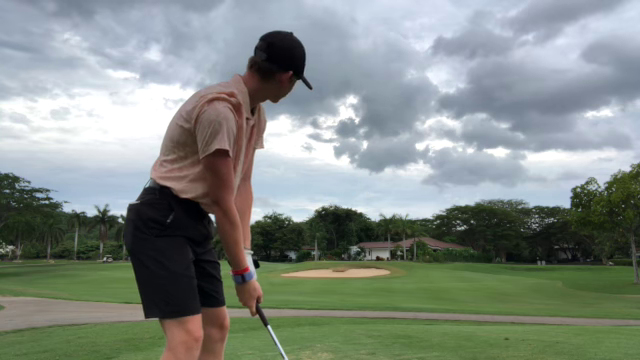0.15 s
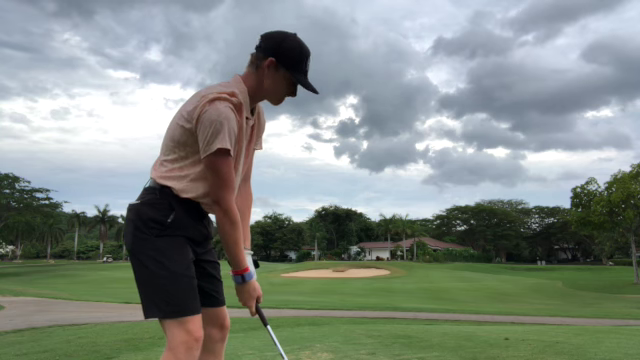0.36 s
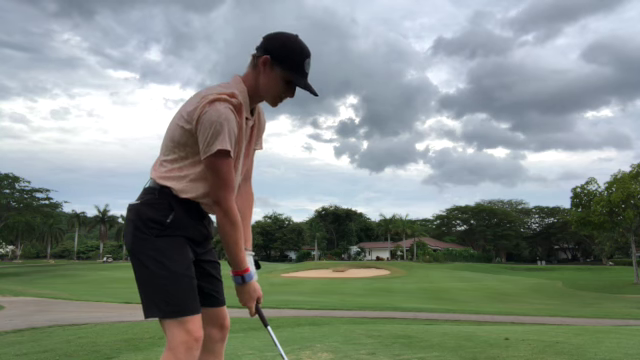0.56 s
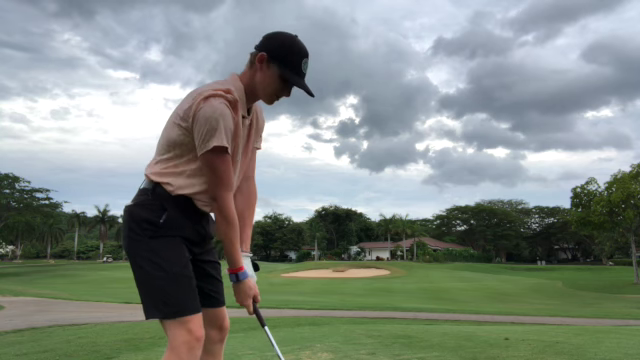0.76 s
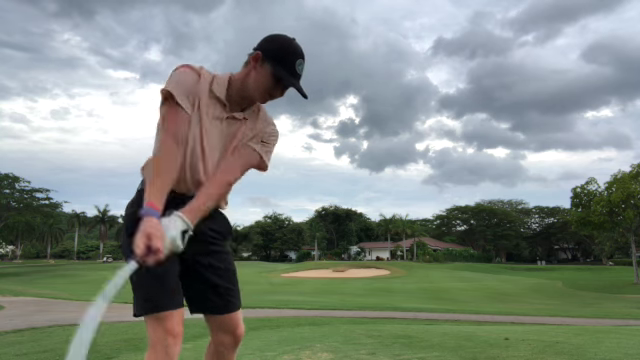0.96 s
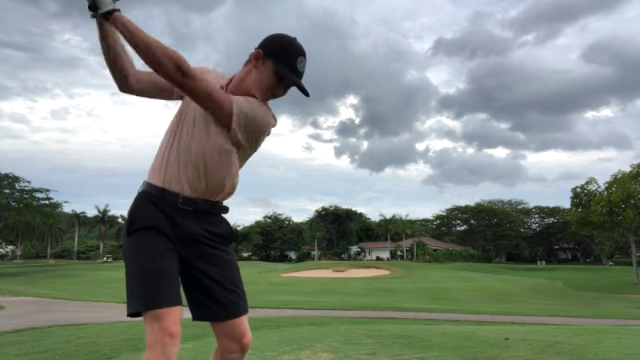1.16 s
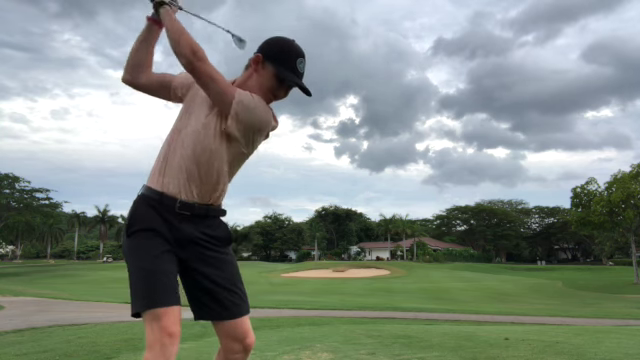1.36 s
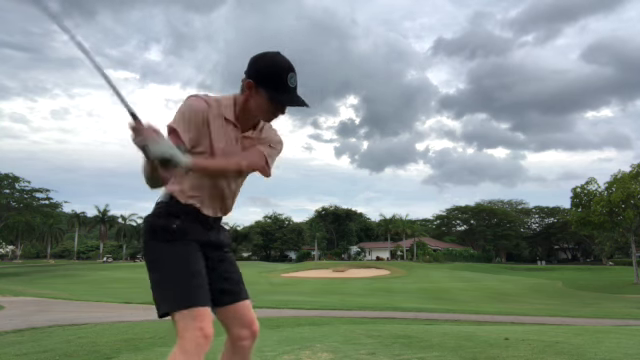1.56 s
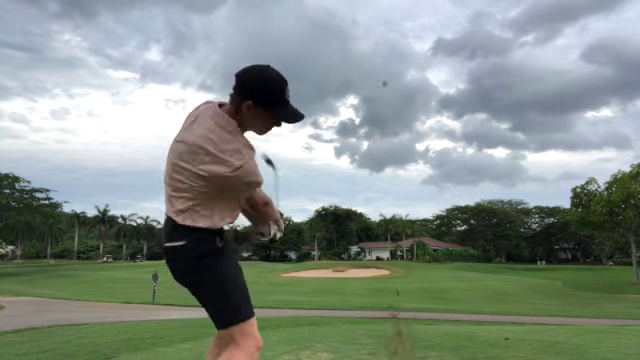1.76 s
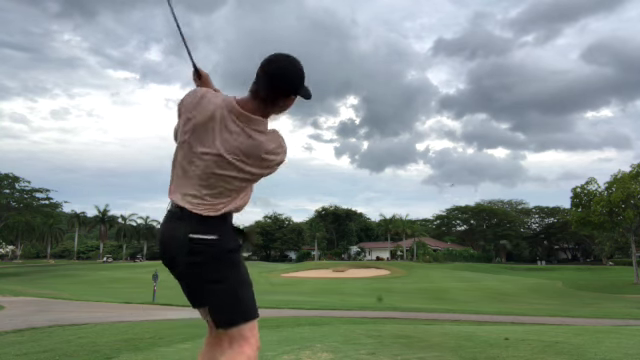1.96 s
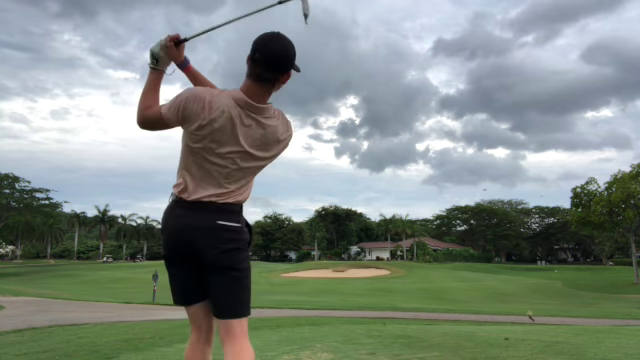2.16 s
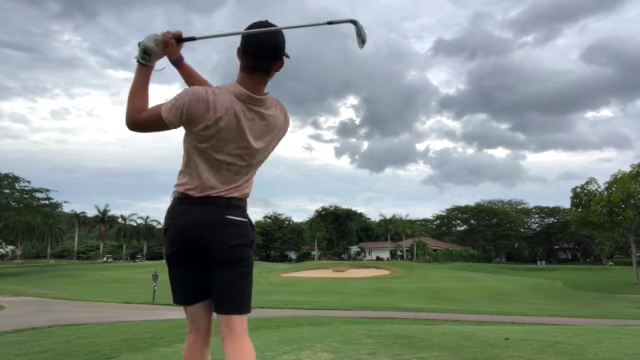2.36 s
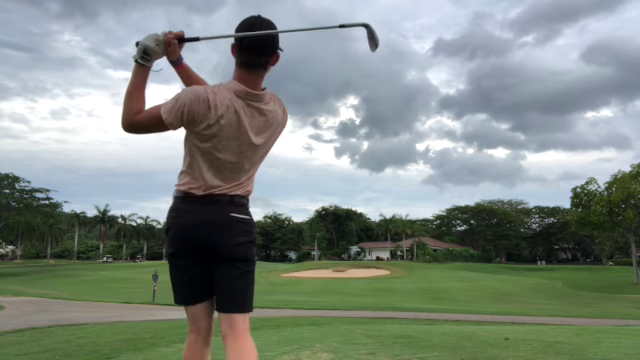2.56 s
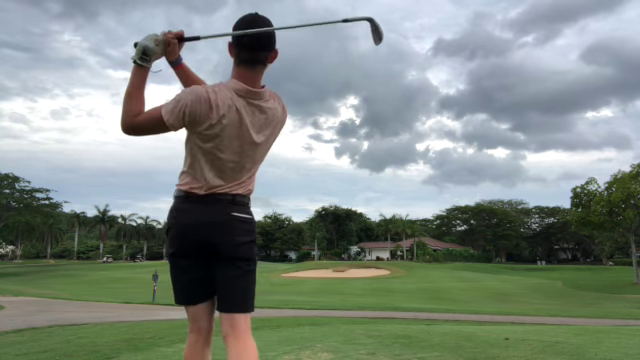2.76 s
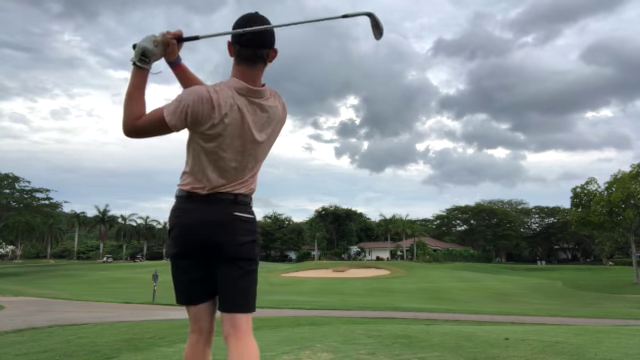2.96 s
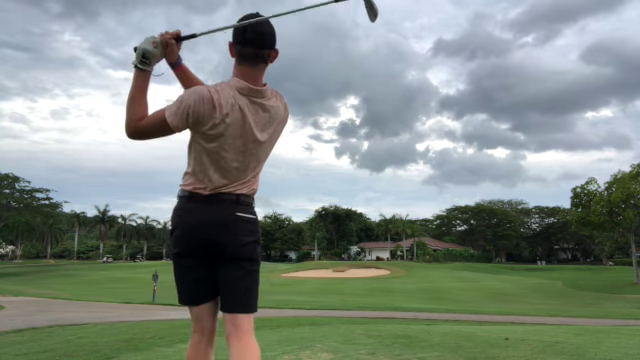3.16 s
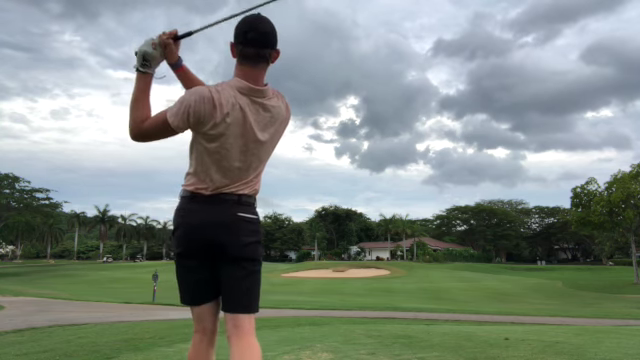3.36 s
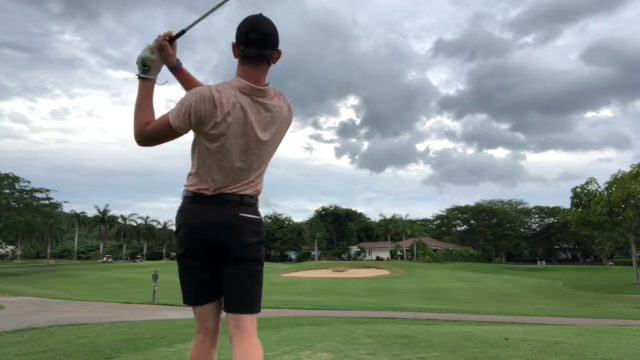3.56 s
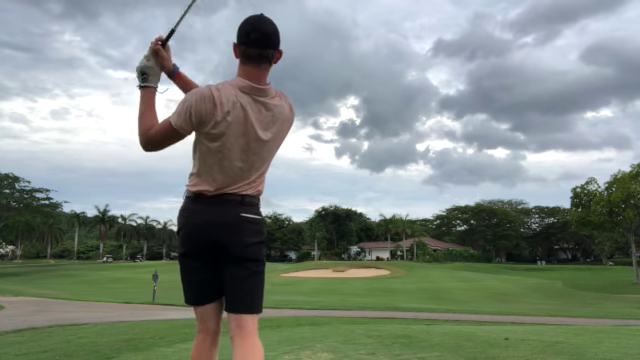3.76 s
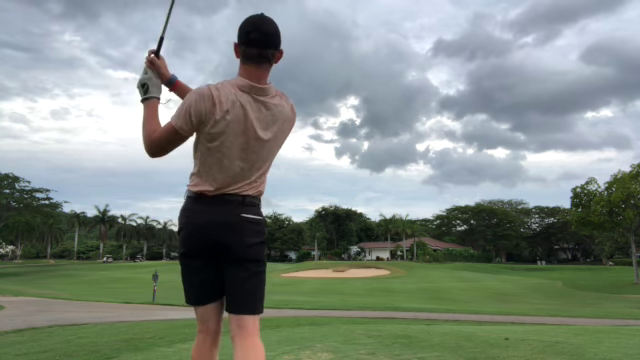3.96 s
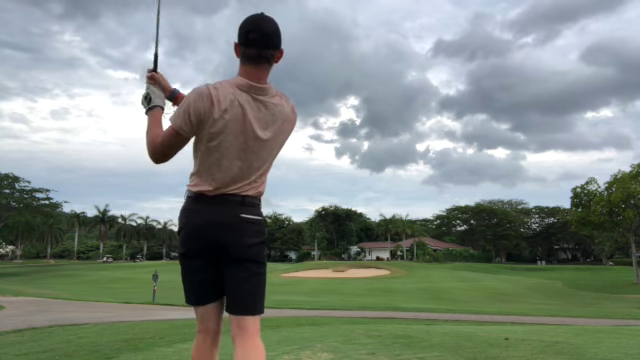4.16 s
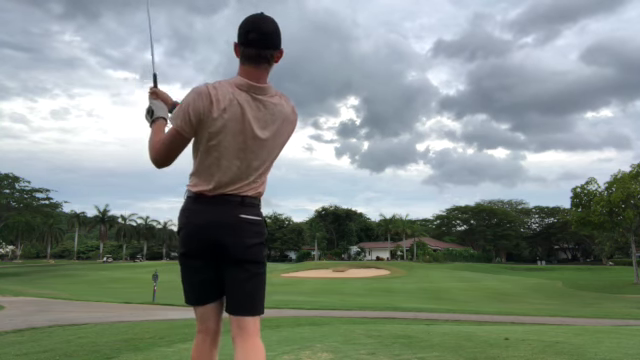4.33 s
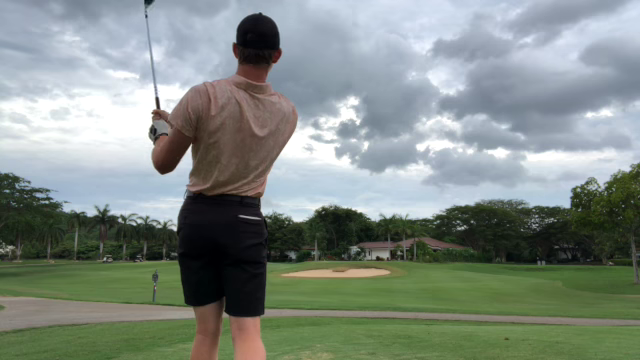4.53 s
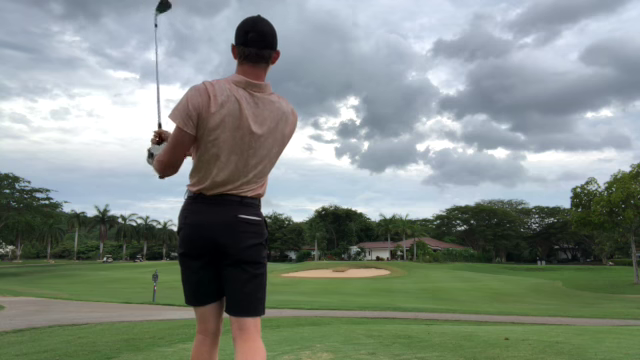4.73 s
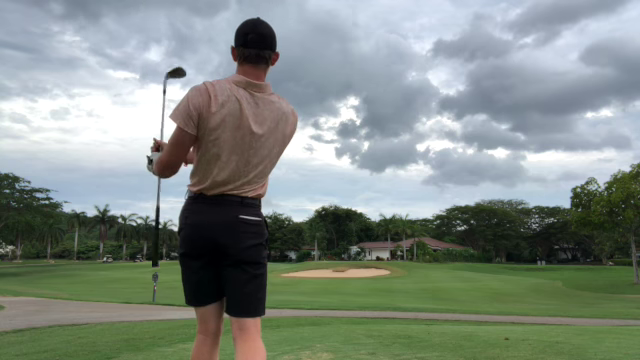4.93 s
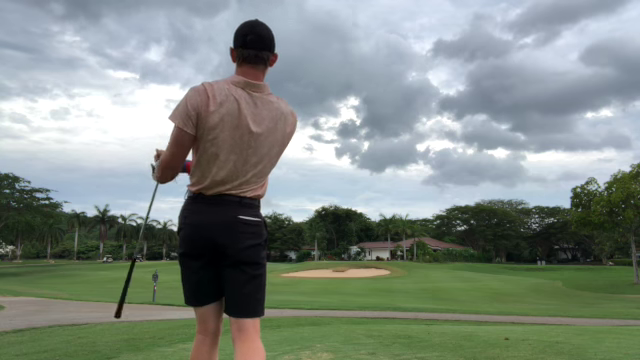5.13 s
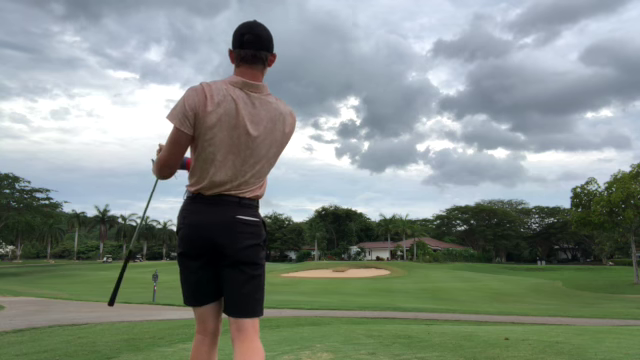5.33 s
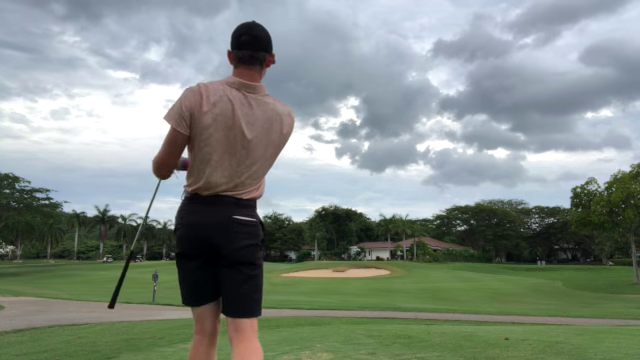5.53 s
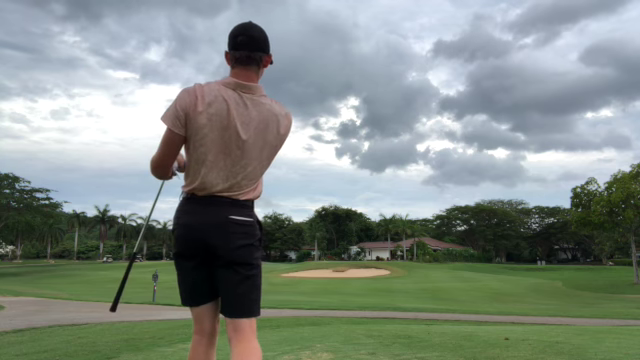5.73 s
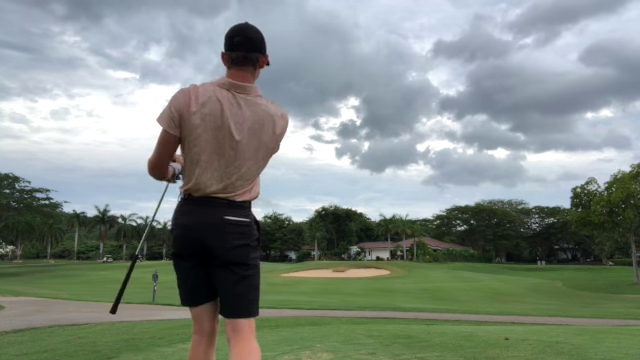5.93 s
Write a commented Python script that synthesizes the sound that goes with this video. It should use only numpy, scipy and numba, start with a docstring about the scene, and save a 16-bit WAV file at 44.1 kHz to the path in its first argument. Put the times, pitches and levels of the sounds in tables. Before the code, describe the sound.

A quiet outdoor background runs for about six seconds: softly hissing leaves, a thin, high insect hiss and the faint low rumble of a distant machine. Small birds chirp faintly from the start, and clothing rustles lightly between 0.7 and 1.3 seconds. At about 1.6 seconds a golf iron whooshes close by, rising quickly in pitch. At 1.7 seconds it hits the ball with one sharp, very short crack, by far the loudest sound, together with a dull thud and a brief rip of turf. Soil sprays and lands in tiny ticks until about 2.2 seconds. Slight rustles of cloth and grass come and go afterwards. Squeaky, slightly hoarse bird calls continue with a little echo from the trees, with a longer note around 3.3 seconds and somewhat clearer calls after 5.3 seconds. Very soft dove coos join from about 4.8 seconds to the end.

```python
"""An open golf course, where someone swings an iron. The shaft whistles through the air, the club face
cracks against the ball and the club tears up turf; crumbs of soil fall back, cloth and grass rustle.
Squeaky birds chatter and doves coo, echoing off far trees. Behind it all insects sing, leaves hiss
and a far machine rumbles."""
import sys
import numpy as np
from scipy import signal
from scipy.fft import rfft, irfft, next_fast_len
from scipy.io import wavfile
from scipy.ndimage import uniform_filter1d
from numba import njit

SR = 44100
rng = np.random.default_rng(int(sys.argv[2]) if len(sys.argv) > 2 else 0)


def store_wav(level_fs):
    """Save 16-bit WAV to argv[1]."""
    pcm = np.round(np.clip(np.atleast_2d(level_fs), -1, 1) * 32767)
    wavfile.write(sys.argv[1], SR, pcm.T.astype(np.int16))


N = 268516
T = np.arange(N) / SR
STRIKE_S = 1.70755  # the club meets the ball

# How loud the shaft whistles, with brief dips (time [s], level [dB])
WHISTLE_LEVELS = [(1.61, -73), (1.645, -48), (1.668, -38.5), (1.675, -28), (1.682, -56), (1.692, -32),
                  (1.708, -50), (1.722, -34.5), (1.732, -54.5), (1.8, -91.5)]
# The tone colour of air rushing past the club head (frequency [Hz], level [dB])
RUSH_COLOUR = [(470, -36.5), (800, -4.5), (1660, -5.5), (2160, -7), (2570, -10), (3860, -13),
               (15500, -26.5)]
def swing():
    """Swirls of air peel off the shaft and whistle higher as it speeds up; the head drags a hiss."""
    fastest_s, fastest_hz, rise_s, brake_s = 1.712, 557.4, .09, .037
    t = T - fastest_s
    # the club speeds up, then the turf brakes it
    speed = np.where(t < 0, np.exp(-np.abs(t / rise_s) ** 3), np.exp(-np.abs(t) / brake_s))
    hz = np.maximum(fastest_hz * speed, 60)
    tone = np.sin(2 * np.pi * np.cumsum(hz * (1 + .0573 * wander(120))) / SR)
    swirls = steep_band(rng.standard_normal(N), hz, .5 * hz) * np.sqrt(SR / hz)
    level = undb(np.interp(T, *np.transpose(WHISTLE_LEVELS), left=-200, right=-200))
    bright_hz = np.clip(7500 * (hz / 560) ** 3.7, 1600, 14000)
    hiss = undb(-45.5) * speed ** 2.6 * band(coloured(RUSH_COLOUR), .25 * bright_hz, 2.2 * bright_hz)
    dip = 1 - .74 * np.exp(-((T - 1.703) / .0039) ** 2)  # just before the hit
    return level * (1.3 * tone + .55 * swirls) + hiss * dip


# The ringing tones of ball, club head and shaft (pitch [Hz], relative level [dB], time to fade 60 dB [s])
CRACK_TONES = [(653, -4.5, .026), (815, -8, 0.025), (1214, -6.5, 0.02), (1460, -7, 0.022),
               (1750, -3.5, .009), (1900, 0.5, 0.0099), (2480, -12.5, 0.009), (2680, 8.5, 0.0036),
               (3000, -8.5, 0.0064), (3576, -2, 0.013), (5950, -8.5, 0.018), (7080, -15.5, 0.015),
               (9950, -16, 0.005), (14000, -12, 0.0048)]
def strike():
    """The blow sets ball and club ringing. Tones below the ball's pitch start later and build slower."""
    ball_hz, contact_s, spread_s = 2645, .0002, .0003
    out = np.zeros(N)
    for hz, db, fade_s in CRACK_TONES:
        slowness = max(ball_hz / hz, 1)
        tone = ring(hz, fade_s, rise_s=contact_s * slowness ** 2)
        add(out, STRIKE_S + spread_s * (slowness - 1), -undb(db - 11) * tone)
    return out


def turf():
    """The ground thuds, a clod thumps loose and soil sprays; the ripping dulls as the club slows."""
    out = np.zeros(N)
    add(out, STRIKE_S + .0029, undb(-27) * ring(hz=190, fade_s=.045, rise_s=.0019))  # ground
    add(out, 1.728, undb(-37) * ring(hz=102.7, fade_s=.075, rise_s=.0031))  # clod
    lead_s, swell_in_s, drag_s = .02, .0012, .009
    bright_hz, dull_hz, dulling_s = 9150, 350, .0037
    t = np.arange(-lead_s, .5, 1 / SR)  # 0 at the hit
    swell_in = np.exp(np.minimum(t, 0) / swell_in_s)  # the noise swells quickly just before the crack
    hz = dull_hz + (bright_hz - dull_hz) * np.exp(-np.maximum(t, 0) / dulling_s)
    rip = steep_band(rng.standard_normal(len(t)), .42 * hz, 1.4 * hz) * np.sqrt(SR / (np.pi * hz))
    grit = undb(3.5) * np.sqrt(hz / hz.max()) * band(rng.standard_normal(len(t)), 4700, 15000)
    tear = undb(-29.5) * fade(np.maximum(t - drag_s, 0), .027) * (rip + grit)
    dust = undb(-60.5) * fade(t, .48) * noise_band(len(t), hz=3800, width_hz=7600)
    coarse_soil = undb(-47.5) * fade(t, .25) * noise_band(len(t), hz=695, width_hz=2154.5)
    add(out, STRIKE_S - lead_s, swell_in * (tear + dust + coarse_soil))
    return out


# Cloth, grass, falling soil and raspy, blurred bird chatter (time [s], length [s], pitch [Hz], level [dB])
RUSTLE_SWELLS = [(0.671, 0.035, 1180, -64.5), (0.678, 0.023, 450, -65.5), (0.755, 0.13, 13000, -74),
                 (0.762, 0.12, 6370, -71), (0.931, 0.24, 3200, -70.5), (1.233, 0.038, 1100, -64),
                 (1.952, 0.12, 9000, -75), (1.73, 0.15, 6900, -77), (1.8, 0.42, 11000, -83),
                 (1.957, .11, 14000, -80), (1.972, 0.12, 423, -67.5), (1.982, 0.1, 990, -58.5),
                 (1.992, 0.082, 2780, -65), (2.367, 0.063, 3380, -69.5), (2.524, 0.062, 2500, -69),
                 (3.245, 0.071, 2900, -72), (3.314, 0.041, 3860, -72.5), (3.416, 0.26, 3600, -76),
                 (4.005, 0.061, 1490, -70), (4.368, 0.13, 2850, -73), (4.604, 0.094, 3300, -73.5),
                 (4.706, 0.044, 1590, -70.5), (5.3, 0.78, 1500, -80.5), (6.045, 0.071, 3260, -69)]
def rustles():
    """Short swells of noise, made grainy by quick, uneven jumps in loudness."""
    grain_samples, scatter_db = 40, 3
    out = np.zeros(N)
    for start, length, hz, db in RUSTLE_SWELLS:
        n, width_hz = int(length * SR), .98 * hz
        sizes = undb(scatter_db * np.minimum(rng.exponential(size=n // grain_samples + 1), 3))
        grains = rng.standard_normal(n) * np.repeat(sizes, grain_samples)[:n]
        rustle = unit(band(steep_band(grains, hz, width_hz), hz, 1.5 * width_hz))
        add(out, start, undb(db) * signal.windows.tukey(n, .6) * rustle)
    return out


# Small knocks and ticks, including soil crumbs landing after the hit (time [s], peak [dB], pitch [Hz])
SMALL_TICKS = [(.679, -51, 1100), (1.032, -51, 3500), (1.882, -45, 2220), (1.995, -56, 1100),
               (2, -52, 2500), (2.010, -48, 2500), (2.029, -50, 3300), (2.038, -48.5, 3300),
               (2.058, -45.5, 1500), (2.127, -49, 6000), (2.175, -48, 1990), (2.175, -54, 12500),
               (4.727, -55, 6500)]
def ticks():
    """Each knock or tick is one tiny tap that dies away at once."""
    out = np.zeros(N)
    for start, db, hz in SMALL_TICKS:
        tap = (1 + .5 * rng.standard_normal(200)) * np.exp(-np.arange(200) / 3)
        tick = steep_band(tap, hz, .83 * hz)
        add(out, start, undb(db) * tick / np.abs(tick).max())
    return out


# The nearer birds' notes, each rising then falling (time [s], length [s], part spent rising [0-1],
# top pitch [Hz], rise [0-1], fall [0-1], level [dB], first step down above the loudest overtone [dB],
# hoarseness [0-1])
BIRD_NOTES = [(0.018, 0.058, .5, 3140, .01, .01, -74, -15, 0.2),
              (.084, .036, .4, 4830, .03, 0, -71.5, -15, .4),
              (.411, .043, .2, 3520, .1, .16, -72.5, -15, .4),
              (0.419, .13, .3, 2290, 0.12, .1, -77, -15, 0.4),
              (0.746, 0.12, 0.54, 2740, .02, 0.08, -75.5, -15, 0.4),
              (1.047, 0.0097, .1, 4700, .01, 0.35, -63, -15, .2),
              (1.051, .005, .2, 3050, .01, .1, -68, -15, .2),
              (1.058, .011, .2, 1430, .01, 0.13, -62.5, -1.5, .2),
              (1.068, .018, .9, 4300, .38, .01, -70, -15, .2),
              (1.085, .022, .1, 2930, 0.04, .35, -71, -15, .2),
              (1.095, .014, .05, 5400, .01, .3, -67, -15, .2),
              (1.098, 0.02, .1, 3930, 0.05, .1, -61, -10, 0.25),
              (1.279, 0.071, .44, 3410, 0, 0.1, -73.5, -15, .4),
              (1.309, 0.041, 0.24, 2880, .2, .3, -74, -15, .4),
              (1.533, 0.064, .9, 2480, .2, .05, -72.5, -7, .4),
              (1.865, .036, .64, 2605, 0.04, .01, -68.5, -15, .4),
              (1.986, 0.025, .46, 2650, 0.1, .04, -67, -15, .4),
              (2.23, .056, .8, 1505, .03, 0.02, -64.5, -7.5, 0.32),
              (2.356, .04, 0.34, 2990, .06, 0.04, -70.5, -14.5, 0.36),
              (2.392, 0.057, .41, 1796, 0.1, 0.2, -72, -10, .5),
              (2.564, .022, .3, 973, .01, .01, -76, -1, 0.44),
              (2.607, 0.039, 0.46, 1445, .14, 0.2, -70, -11, 0.6),
              (2.807, .037, .2, 3150, 0.06, .15, -71.5, -15, 0.34),
              (2.817, 0.037, 0.98, 2290, 0.08, 0.05, -66.5, -13, 0.4),
              (2.968, 0.026, 0.28, 2245, .02, 0.05, -71.5, -13, .4),
              (2.997, 0.056, 0.7, 1710, 0.07, 0.16, -62.5, -9, 0.42),
              (3.123, 0.017, .17, 3480, 0.1, .1, -70.5, -15.5, .4),
              (3.218, 0.092, 0.75, 3550, 0.22, 0.1, -74, -15, .3),
              (3.284, .315, .52, 1310, 0.11, 0.1, -64, -18.5, 0.08),
              (3.498, .032, 0.25, 3520, .04, 0.07, -67.5, -18, .4),
              (3.798, 0.033, .75, 4300, .1, .1, -77, -14, .3),
              (3.848, .023, .4, 4110, .01, 0.03, -70, -15, .3),
              (3.892, .029, .3, 4010, .06, .06, -75, -15, .3), (3.956, 0.026, .3, 3620, 0, 0, -73, -15, .3),
              (4.269, 0.079, 0.33, 3280, .05, 0.1, -75.5, -15.5, .3),
              (4.394, .022, .1, 3500, .01, .25, -71, -15, .2),
              (4.425, .022, .9, 2900, .2, .01, -74, -15, .2),
              (4.438, .022, .05, 4200, .01, .2, -74, -15, .2),
              (4.461, .01, .3, 3550, .02, .03, -72, -15, .2),
              (4.473, 0.024, .05, 3050, .01, .22, -73, -15, .2),
              (4.611, .019, .05, 4850, 0.1, .32, -72, -15, .2),
              (4.625, .008, .3, 4920, .03, .03, -68, -15, .2),
              (4.637, .008, .23, 5050, .02, .05, -73, -15, .2),
              (4.64, .007, .5, 4200, .03, .03, -72, -15, .2),
              (4.653, .018, .2, 4750, .1, .22, -68, -15, .2),
              (4.674, .01, .3, 3600, .02, .02, -72, -15, .2),
              (4.937, 0.043, .33, 2200, .02, 0, -70.5, -14.5, 0.23),
              (5.226, 0.069, .4, 947, .07, 0.1, -68.5, -2.5, .2),
              (5.293, 0.032, .85, 5100, 0.1, .02, -72.5, -13, .2),
              (5.345, 0.0547, 0.74, 1716, 0.08, 0.15, -63.5, -14, 0.55),
              (5.451, .036, .4, 920, 0.06, .08, -72, -5, .2),
              (5.546, 0.041, 0.82, 908, 0, .03, -76.5, -.5, .3),
              (5.62, 0.047, 0.56, 1557, .2, 0.28, -59, -16, 0.38),
              (5.682, 0.028, .3, 1850, .02, .1, -72, -5, .3),
              (5.806, .2, 0.3, 1511, 0.27, .2, -59.5, -14, 0.18),
              (5.89, 0.13, 0.43, 3500, .06, 0.14, -72.5, -13, 0.85)]
def birds():
    """Nearer birds squeak and a faint flock chatters around their notes; distance dulls the treble."""
    flock_notes, answer_s, low_hz, high_hz = 240, .15, 800, 4200
    out, flutter = np.zeros(N), wander(1200)
    for start, *shape, db, tilt_db, hoarseness in BIRD_NOTES:
        add(out, start, undb(db) * bird_note(flutter, *shape, tilt_db, hoarseness))
    for which, when, long, rising, pitch, depth, faint in rng.random((flock_notes, 7)):
        start = abs(BIRD_NOTES[int(which * len(BIRD_NOTES))][0] + answer_s * (2 * when - 1))
        top_hz = low_hz * (high_hz / low_hz) ** pitch
        db = -81 - 1.1 * np.log(faint + .052)
        note = bird_note(flutter, .012 + .036 * long, rising, top_hz,
                         rise=.1, fall=.1 + .2 * depth, tilt_db=-8, hoarseness=.8)
        add(out, start, undb(db) * note)
    return signal.sosfilt(signal.butter(3, 6200, fs=SR, output="sos"), out)


def bird_note(flutter, length, rising, top_hz, rise, fall, tilt_db, hoarseness):
    """One note slides up and down; the throat favours one overtone (a multiple of the pitch)."""
    throat_hz, quaver, blur = 3000, .035, .6
    progress = np.linspace(0, 1, int(length * SR))
    rising = np.clip(rising, .03, .97)
    hz = top_hz * (1 - np.where(progress < rising, rise, fall) * (1 - arch(progress, rising)))
    i = rng.integers(N - SR)
    rough = hoarseness * (.4 + 1.2 * progress) * flutter[i:i + len(progress)]  # hoarser towards the end
    phase = 2 * np.pi * np.cumsum(hz * (1 + quaver * uniform_filter1d(rough, size=200))) / SR
    loudest = max(round(throat_hz / top_hz), 1)
    # overtones of nasal voices weaken ever faster; those of purer ones drop at once, then level off
    curve = np.clip(-6 / min(tilt_db, -.1), .45, 1.7)
    voice = 0
    for k in range(1, int(9000 / top_hz) + 1):
        db = -13 * (loudest - k) if k < loudest else tilt_db * (k - loudest) ** curve
        voice += undb(db) * np.sin(k * phase + blur * max(k - loudest, 0) * rough)
    swell = arch(progress, np.clip(rising, .35, .75)) ** .6
    return (1 + 1.2 * rough) * swell * np.sqrt(2) * voice


# The doves' coos (time [s], length [s], pitch [Hz], level [dB])
DOVE_COOS = [(4.825, .035, 770, -74), (5.333, .042, 715, -72), (5.46, .15, 462, -72), (5.62, .31, 458, -73),
             (5.97, .12, 450, -77)]
def doves():
    """Each coo is a soft, pure tone whose loudness wavers."""
    out = np.zeros(N)
    for start, length, hz, db in DOVE_COOS:
        t = T[:int(length * SR)]
        swell = signal.windows.tukey(len(t), .4) * undb(db + 1.9 * wander(24)[:len(t)])
        add(out, start, swell * np.sqrt(2) * np.sin(2 * np.pi * hz * t))
    return out


def tree_echo(calls, decay_s=.045, echo_db=-9.5):
    """The calls, plus the smeared echo that bounces back from many trees."""
    t = T[:int(4 * decay_s * SR)]
    bounces = rng.standard_normal(len(t)) * np.exp(-t / decay_s)
    return calls + undb(echo_db) * signal.fftconvolve(calls, bounces / np.linalg.norm(bounces))[:N]


# Two choirs of far insects (pitch [Hz], width [Hz], level [dB])
INSECT_CHOIRS = [(8150, 2200, -86.5), (9680, 2600, -88.5)]
def insects(db_per_s=-.9):
    """Each choir blurs into a high, thin hiss that slowly fades."""
    out = np.zeros(N)
    for hz, width, db in INSECT_CHOIRS:
        level = undb(db + db_per_s * (T - T.mean()) + .5 * wander(.69))
        out += level * unit(band(steep_band(rng.standard_normal(N), hz, width), hz, width))
    return out


# The tone colour of the leaf hiss (frequency [Hz], level [dB])
LEAF_COLOUR = [(15, -53), (25, -14.5), (76, -3.5), (102, -3), (449, -19.5), (1090, -21.5), (1730, -21),
               (2260, -25.5), (2660, -25.5), (3990, -30), (5520, -35.5), (8270, -37), (11100, -40.5),
               (14200, -40.5), (15800, -46.5)]
# How loud the leaves are above 200 Hz (time [s], level [dB])
LEAF_LEVELS = [(0, -67), (1.56, -67.5), (1.81, -63.5), (2.27, -67.5), (5.27, -68.5), (5.48, -66),
               (6.09, -66.5)]
def leaves():
    """Leaves hiss, and each octave of the hiss flickers on its own."""
    noise = coloured(LEAF_COLOUR)
    hiss = sum(undb(.33 * wander(10)) * band(noise, hz, hz / .36) for hz in 45 * 2. ** np.arange(9))
    above_bass = signal.sosfilt(signal.butter(2, 200, "high", fs=SR, output="sos"), hiss)
    level = undb(np.interp(T, *np.transpose(LEAF_LEVELS)))
    return level * hiss / np.sqrt(np.mean(above_bass ** 2))


# The far machine's low drones (pitch [Hz], width [Hz], level [dB])
MACHINE_DRONES = [(46, 7.7, -67.5), (93.1, 9.2, -65.5)]
def machine(db_per_s=-.7):
    """A wavering rumble that fades as the machine draws away."""
    return sum(undb(db + db_per_s * (T - T.mean()) + 2 * wander(3.706)) * noise_band(N, hz, width)
               for hz, width, db in MACHINE_DRONES)


def undb(db):
    """Turn decibels into a volume factor."""
    return 10 ** (np.asarray(db) / 20)


def unit(x):
    """Scale a sound to an average strength (rms) of 1."""
    return x / np.sqrt(np.mean(x ** 2))


def add(out, start, x):
    """Mix x into out at a start time in seconds."""
    i = int(start * SR)
    out[i:i + len(x)] += x[:N - i]


def fade(t, fade_s):
    """Die away by 60 dB every fade_s seconds."""
    return 1000 ** (-t / fade_s)


def ring(hz, fade_s, rise_s):
    """A struck tone that builds up during the contact, then dies away."""
    t = T[:int(fade_s * SR)]
    return np.sin(2 * np.pi * hz * t) * fade(t, fade_s) * (1 - np.exp(-t / rise_s))


def arch(progress, peak):
    """A curve that is 0 at both ends and 1 where progress reaches peak."""
    return np.sin(np.pi / 2 * np.minimum(progress / peak, (1 - progress) / (1 - peak)))


def wander(rate):
    """A smooth random wobble of size about 1, with rate new values a second."""
    hold = int(SR / rate)
    steps = np.repeat(rng.standard_normal(N // hold + 1), hold)
    return 1.3 * uniform_filter1d(uniform_filter1d(steps, hold), hold)[:N]


def coloured(colour):
    """Noise of strength 1, shaped by rows of (frequency [Hz], level [dB])."""
    hz, db = np.transpose(colour)
    n = next_fast_len(N)
    gain = undb(np.interp(np.log(np.arange(1, n // 2 + 2) * SR / n), np.log(hz), db))
    return unit(irfft(rfft(rng.standard_normal(n)) * gain, n)[:N])


@njit
def moving_band(x, hz, width_hz):
    """A band filter whose centre and width are given for every sample."""
    out, mid, low = np.empty(len(x)), 0., 0.
    for i in range(len(x)):
        tuning, damping = np.tan(np.pi * hz[i] / SR), width_hz[i] / hz[i]
        passed = (mid + tuning * (x[i] - low)) / (1 + tuning * (tuning + damping))
        mid, low = 2 * passed - mid, low + 2 * tuning * passed
        out[i] = damping * passed
    return out


def band(x, hz, width_hz):
    """Keep the part of a sound near hz, which may be steady or moving."""
    return moving_band(x, hz + np.zeros(len(x)), width_hz + np.zeros(len(x)))


def steep_band(x, hz, width_hz):
    """Filter twice for sharper edges."""
    return band(band(x, hz, width_hz), hz, width_hz)


def noise_band(n, hz, width_hz):
    """n samples of noise near hz, at strength 1."""
    return unit(band(rng.standard_normal(n), hz, width_hz))


def scene():
    """The golf shot and its surroundings, in one channel."""
    foreground = swing() + strike() + turf() + rustles() + ticks()
    return (foreground + tree_echo(birds() + doves()) + insects() + leaves() + machine())[None]


def record(dry, low_hz=42, top_hz=16400):
    """Cut the deepest bass and the highest treble."""
    low_cut = signal.butter(4, low_hz, "high", fs=SR, output="sos")
    top_cut = signal.ellip(10, .2, 80, top_hz, fs=SR, output="sos")
    return signal.sosfilt(top_cut, signal.sosfilt(low_cut, dry))


dry = scene()
out = record(dry)
store_wav(out)
```